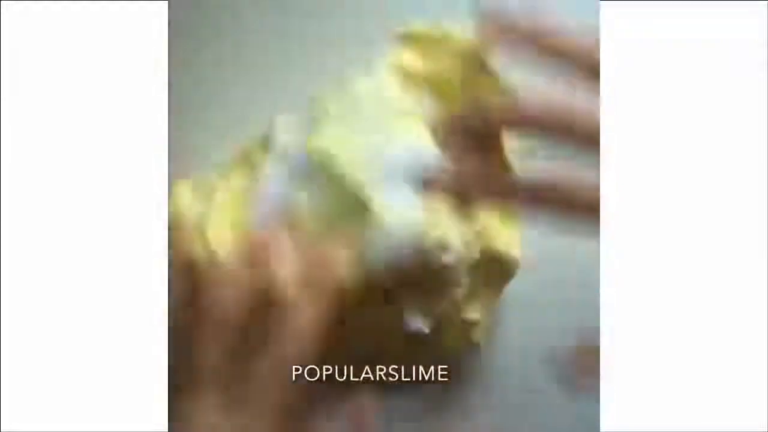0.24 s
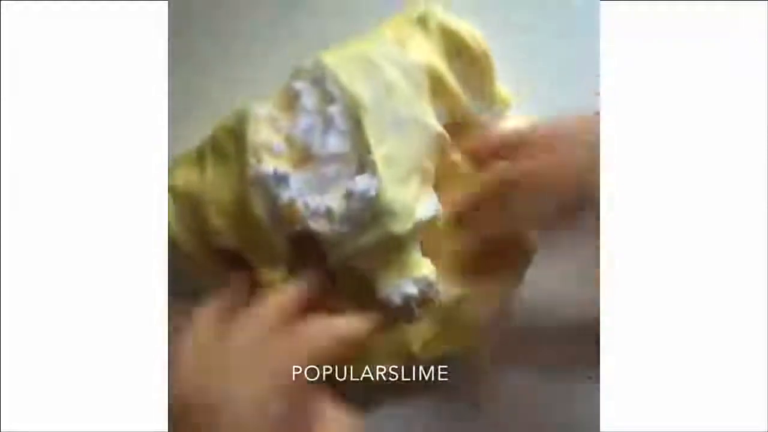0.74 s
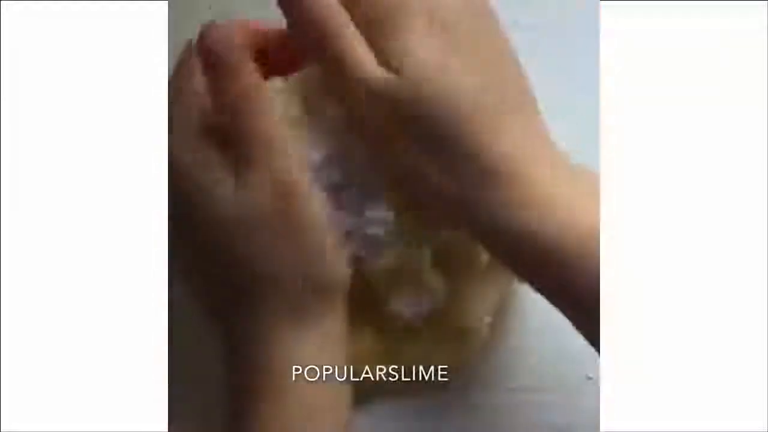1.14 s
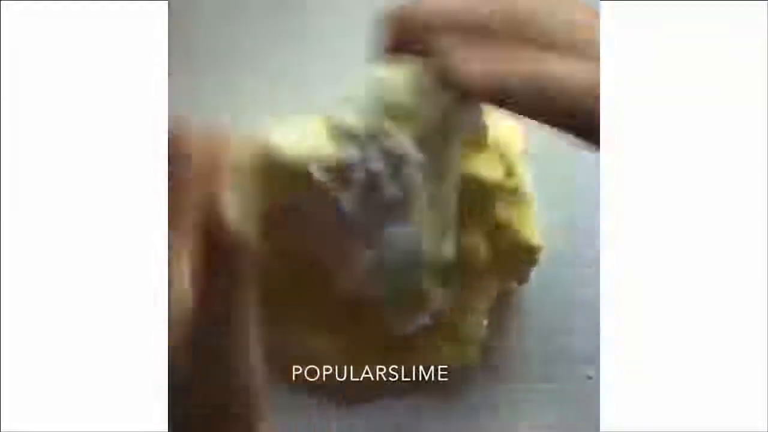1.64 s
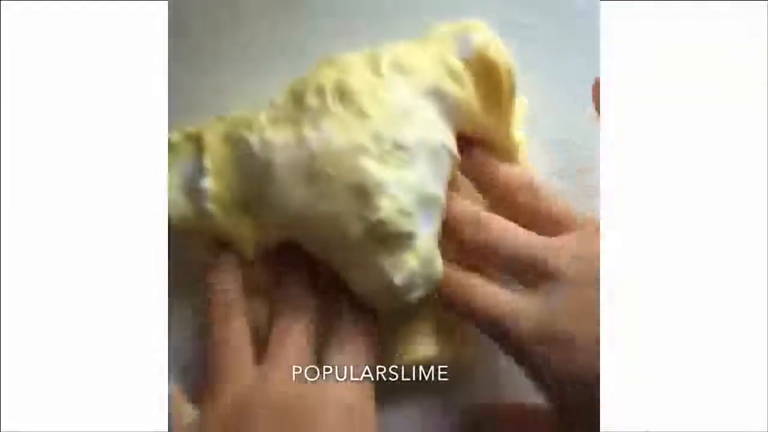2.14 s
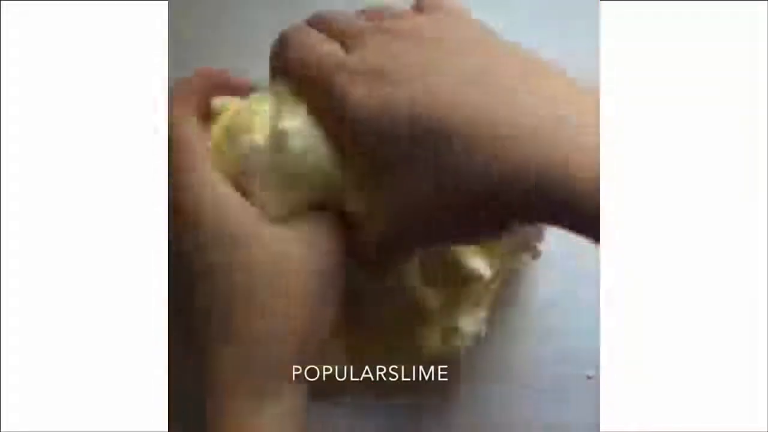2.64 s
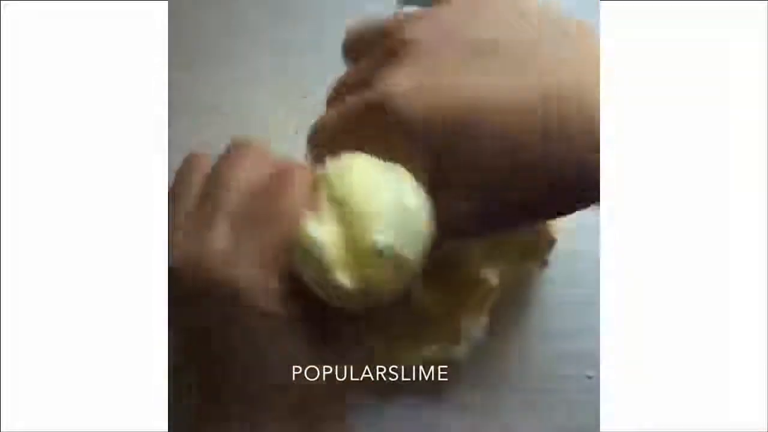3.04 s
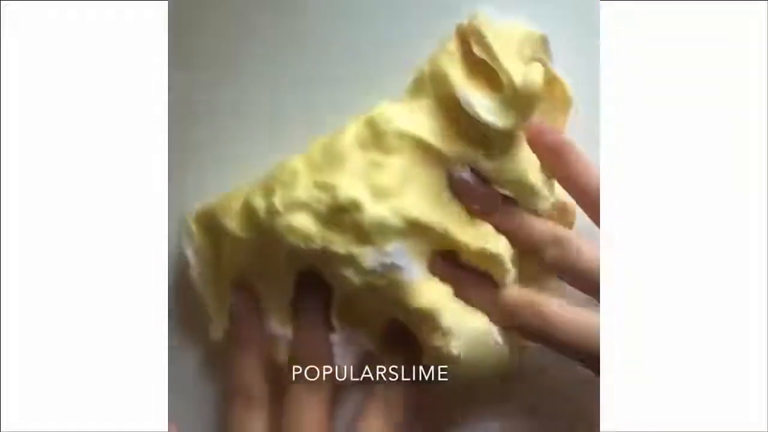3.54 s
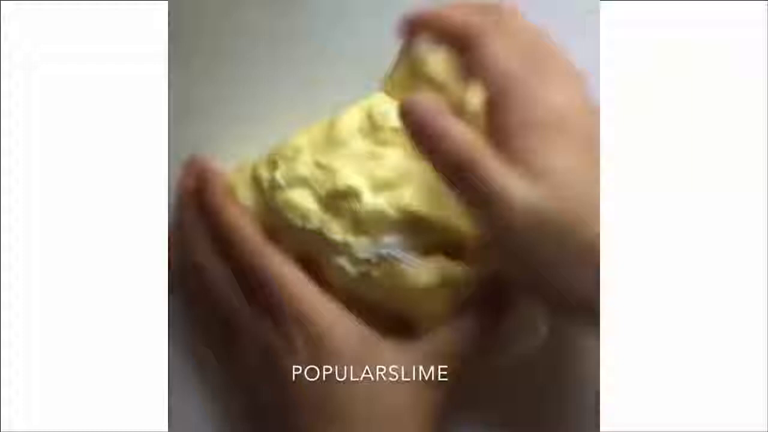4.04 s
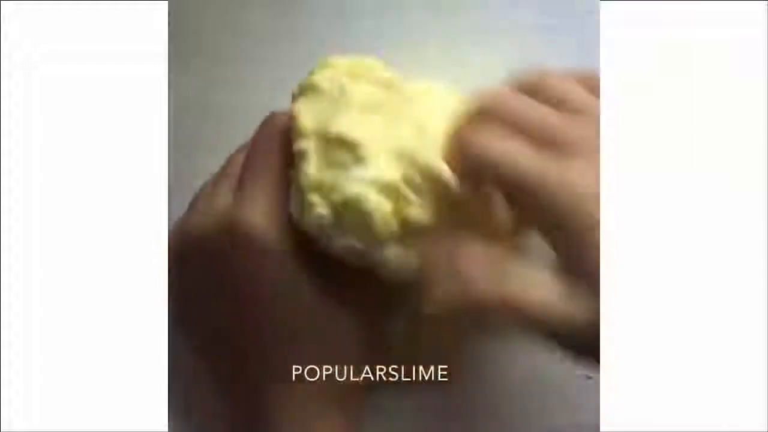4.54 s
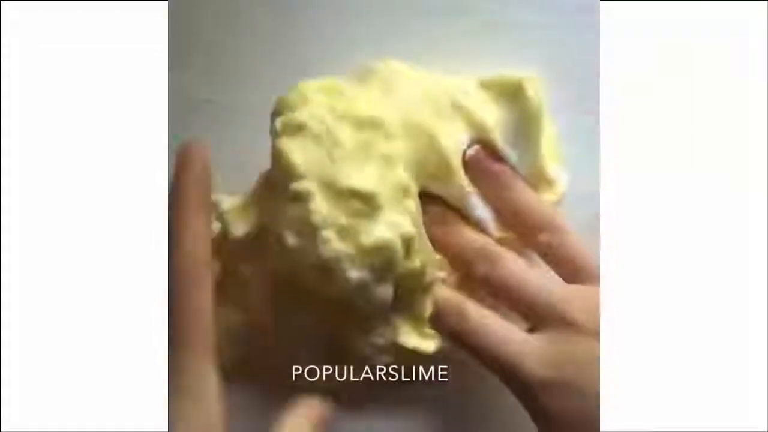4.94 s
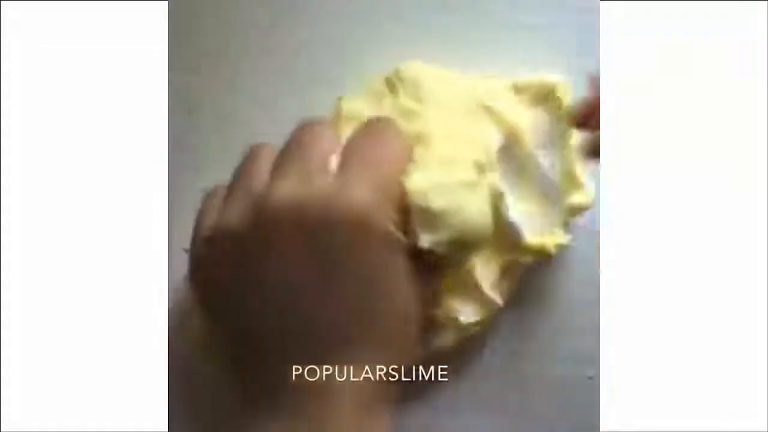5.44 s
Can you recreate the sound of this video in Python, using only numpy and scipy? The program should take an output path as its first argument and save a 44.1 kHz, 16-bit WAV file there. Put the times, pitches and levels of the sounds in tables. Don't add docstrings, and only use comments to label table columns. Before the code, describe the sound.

Close phone-like microphone, short dry room, faint hiss. Thick foamy paste is squeezed, folded and peeled: loud bright pops first, then a slap, more hard cracks, a quieter stretch with soft thuds, a burst of snaps, wet peeling, small ticking bubbles, a brief airy squeak and a last pop. Handling makes low rumbles.

```python
import sys
import numpy as np
from scipy import signal
from scipy.fft import rfft, irfft, next_fast_len
from scipy.io import wavfile
from scipy.ndimage import uniform_filter1d, map_coordinates

SR = 44100
rng = np.random.default_rng(int(sys.argv[2]) if len(sys.argv) > 2 else 0)


def volts(x):
    e = np.asarray(x, float) / 20
    return 10 ** e


def materialize(psi):
    bounded = np.clip(np.atleast_2d(psi).T, -1, 1)
    quanta = np.round(bounded * 32767).astype(np.int16)
    wavfile.write(sys.argv[1], SR, quanta)


N = 251370


def unit(x):
    return x / np.sqrt(np.mean(x ** 2, axis=-1, keepdims=True) + 1e-20)


def peaked(x, level_db):
    return volts(level_db) * x / np.abs(x).max()


def along(points, hz):
    f, v = np.transpose(points)
    return np.interp(np.log(hz + 1), np.log(f + 1), v)


def wobble(rate):
    knots = rng.standard_normal(int(N * rate / SR) + 4)
    return map_coordinates(knots, [np.arange(N) * rate / SR])


def filtered(x, response):
    m = next_fast_len(x.shape[-1] + 4096)
    return irfft(rfft(x, m) * response(np.fft.rfftfreq(m, 1 / SR)), m)[..., :x.shape[-1]]


def coloured(x, colour):
    return filtered(x, lambda f: volts(along(colour, f)))


def mode(f, hz, width_hz):
    return 1j * f * width_hz / (hz * hz - f * f + 1j * f * width_hz)


def crackle(n, spiky_db):
    return rng.standard_normal(n) * volts(spiky_db * np.minimum(rng.exponential(size=n), 3.5))


def strokes(starts, holds, levels_db, rise, sag, fall):
    out = np.full(N // 64 + 2, -120.)
    t = np.arange(len(out)) * 64 / SR
    for s, hold, db in zip(starts, holds, levels_db):
        before, held = np.maximum(s - t, 0), np.clip(t - s, 0, hold)
        after = np.maximum(t - s - hold, 0)
        out = np.maximum(out, db - rise * before - sag * held - fall * after)
    return np.interp(np.arange(N) / SR, t, out)


# pitch_hz [Hz], level_db [dB per Hz]
HUSH_COLOUR = [(18, -23), (30, 6.5), (80, 11), (187, -8), (500, -10.5), (1030, -15.5), (1440, -49.5),
               (2120, -56), (2540, -13), (5950, -19), (10500, -27), (12900, -13.5), (14300, -47.5)]


def hush():
    return volts(-60) * unit(coloured(rng.standard_normal(N), HUSH_COLOUR))


# pitch_hz [Hz], t60_s [s]
ROOM_DECAY = [(200, 0.5), (2000, 0.34), (6000, 0.28), (14000, 0.21)]


def room(x):
    out, step = np.zeros(N + 2 * SR), SR // 3
    for start in range(0, N, step):
        hz, t, z = signal.stft(rng.standard_normal(SR // 2), SR, nperseg=256)
        decay = volts(-60 * t / along(ROOM_DECAY, hz)[:, None])
        tail = signal.istft(z * decay, SR, nperseg=256)[1]
        echo = signal.fftconvolve(x[start:start + step], tail / np.linalg.norm(tail))
        out[start + 200:][:len(echo)] += echo
    return out[:N]


TABLE_HZ = 174.3
# pitch_hz [Hz], level_db [dB per Hz]
RUMBLE_COLOUR = [(20, -49), (45, 2), (58, 6.5), (75, 7), (95, -11.5), (120, 1), (200, -35)]
# start_s [s], hold_s [s], level_db [dB]
PHONE_JOLTS = [(0.114, .01, -43), (0.374, 0.11, -48), (0.918, 0.0095, -37.5), (1.12, 0.038, -39),
               (1.454, 0.0068, -42.5), (1.704, 0.035, -44), (1.899, 0.0095, -40), (2.2, .03, -50.5),
               (2.466, 0.053, -36.5), (2.713, 0.12, -48), (3.301, 0.018, -39), (3.707, 0.11, -55),
               (3.898, 0.0075, -34), (4.123, 0.23, -45), (4.694, 0.11, -52), (5.057, 0.037, -39.5),
               (5.376, 0.011, -42.5), (5.6, .01, -58)]


def phone_rumble():
    restless = rng.standard_normal(N) * volts(6.5 * wobble(25))
    hum = unit(filtered(restless, lambda f: mode(f, TABLE_HZ, 30) * mode(f, TABLE_HZ, 86)))
    rumble = unit(coloured(rng.standard_normal(N), RUMBLE_COLOUR))
    shake_db = strokes(*np.transpose(PHONE_JOLTS), rise=259.5, sag=15, fall=140.5)
    shake_db = np.maximum(shake_db, -57)
    return volts(shake_db) * (rumble + 0.26 * hum) + volts(-62.5) * hum


# pitch_hz [Hz], width_hz [Hz], level_db [dB]
TABLE_MODES = [(296, 47, 3), (470.6, 350, -7), (497, 94, -0.5), (637, 57, -1.5), (755, 25, 1),
               (985, 83, -3.5), (1310, 100, -7), (1786, 100, -13.5), (2080, 90, -17.5), (2450, 200, -19),
               (2860, 150, -18.5)]


def table_top(f):
    return sum((-1) ** k * volts(db) * mode(f, hz, w) for k, (hz, w, db) in enumerate(TABLE_MODES))


# middle_s [s], peak_db [dB], length_s [s]
PRESSES = [(0.08, -10, 0.0014), (0.345, -40.5, 0.021), (0.894, -27.5, 0.009), (0.909, -22, 0.0029),
           (0.929, -21, 0.042), (1.089, -15, 0.017), (1.12, -27, 0.042), (1.27, -40, 0.031),
           (1.368, -40, 0.016), (2.443, -16, 0.016), (2.485, -19, 0.024), (2.67, -34, 0.016),
           (2.696, -36, 0.019), (2.73, -27.5, .012), (3.251, -33, 0.018), (3.302, -30, 0.018),
           (3.338, -32.5, 0.018), (3.873, -29, .021), (3.894, -23, 0.02), (4.096, -21.5, 0.016),
           (4.138, -25.5, 0.053), (4.201, -30.5, 0.0057), (4.231, -31.5, 0.072), (4.53, -34, 0.025),
           (4.959, -36.5, 0.038), (5.031, -26.5, 0.014), (5.1, -32, 0.038), (5.317, -33, 0.019),
           (5.357, -33.5, .037), (5.408, -42, 0.052), (5.593, -25, 0.0077), (5.612, -37, 0.011),
           (1.19, -35.5, 0.026), (1.302, -40.5, 0.014), (4.35, -40.5, 0.031)]
KICK_DB, KICK_S = -41.5, .007


def presses():
    lead = 3000
    t = np.arange(-lead, lead) / SR
    boom, force = np.zeros((2, N + SR))
    pushes = PRESSES + [(s + KICK_S, db + KICK_DB, KICK_S) for s, db, *_ in BURSTING_POCKETS]
    for s, db, length in pushes:
        detune, turn = rng.standard_normal(2)
        swell = volts(db) * np.exp(-np.log(16) * (t / length) ** 2)
        where = slice(round(s * SR), round(s * SR) + len(t))
        boom[where] += swell * np.sin(2 * np.pi * TABLE_HZ * (1 + 0.025 * detune) * t + 9 * turn)
        force[where] += swell
    stir = unit(filtered(rng.standard_normal(N), table_top))
    return boom[lead:][:N] + volts(-20.5) * force[lead:][:N] * stir


# start_s [s], hold_s [s], wet_db [dB squelch], fizz_over_wet_db [dB]
SLOW_SQUEEZES = [(0.005, 0.17, -35, 3.5), (0.27, 0.089, -38.5, 4), (0.34, 0.012, -29.5, -2),
                 (0.73, 0.055, -53, -1.5), (1.09, 0.1, -55.5, -26), (1.19, 0.07, -43.5, -2),
                 (1.35, 0.12, -53.5, -2.5), (1.58, 0.088, -45, 11.5), (1.72, 0.033, -41, 2),
                 (1.79, 0.066, -38.5, 4.5), (1.85, 0.033, -41.5, 4.5), (2.67, 0.0091, -55, -12),
                 (2.73, 0.1, -59, -14), (2.9, 0.046, -55.5, 4.5), (3.03, 0.023, -35, 6),
                 (3.23, .015, -41, 6.5), (3.39, 0.023, -51.5, 5.5), (4.1, 0.14, -60, -8.5),
                 (4.31, 0.052, -50.5, 0), (4.43, 0.043, -50, 6), (4.52, .03, -51.5, 9.5),
                 (4.585, 0.0078, -42, 10), (4.64, .04, -47, 7), (4.79, .07, -54, 3), (5.41, .05, -56, 4),
                 (5.5, 0.024, -53, 8), (5.62, 0.06, -38, 0)]
# start_s [s], hold_s [s], wet_db [dB squelch], fizz_over_wet_db [dB]
HAND_PEELS = [(0.892, 0.046, -34, 0.8), (2.432, 0.035, -30, 0), (3.228, .018, -33, 2.5),
              (3.25, 0.012, -29.5, 1), (3.268, 0.024, -30.5, 0.5), (3.303, 0.015, -34.5, 0.5),
              (3.33, 0.011, -37.5, 5), (3.865, 0.055, -35, 3), (4.68, 0.1, -37.5, 3.5),
              (4.904, 0.02, -40, 1), (4.936, 0.014, -33, 2.5), (4.982, .01, -36, 0),
              (5.008, 0.02, -30.5, -1), (5.041, 0.008, -31.5, -1), (5.058, 0.016, -34, 1.5),
              (5.086, 0.0058, -32.5, -3), (5.102, 0.012, -38, -2), (5.308, 0.092, -32.5, -3.5)]


def effort():
    levels = [np.full((2, N), [[-63], [-64.5]])]
    squeeze_shape = dict(rise=232.5, sag=17, fall=264)
    peel_shape = dict(rise=745, sag=70, fall=546)
    for rows, shape in ((SLOW_SQUEEZES, squeeze_shape), (HAND_PEELS, peel_shape)):
        s, hold, wet_db, over_db = np.transpose(rows)
        levels.append([strokes(s, hold, db, **shape) for db in (wet_db, wet_db + over_db)])
    return np.max(levels, axis=0)


def bubbles(count, centre_hz, octaves, cycles, spiky_db):
    draw, t = rng.random((count, 3)), np.arange(256) / SR
    hz = np.clip(centre_hz * 2 ** (octaves * rng.standard_normal((count, 1))), 400, 14000)
    size_db = -spiky_db * np.log(draw[:, 1:2] + 0.018)
    age = t * hz / (cycles * (.5 + draw[:, 2:]))
    ring = volts(size_db) * age * np.exp(-3 * age) * np.sin(2 * np.pi * hz * t * (1 + 0.1 * age))
    where = (draw[:, :1] * N).astype(int) + np.arange(256)
    return unit(np.bincount(where.ravel(), ring.ravel(), N + 256)[:N])


def rush(colour, patchy_db):
    z = signal.stft(rng.standard_normal(N), nperseg=256)[2]
    field = uniform_filter1d(rng.standard_normal(z.shape), size=5, axis=0)
    field = uniform_filter1d(field, size=4, axis=1)
    noise = signal.istft(z * volts(patchy_db * field / field.std()), nperseg=256)[1][:N]
    return unit(coloured(noise, colour))


# pitch_hz [Hz], level_db [dB per Hz]
WET_COLOUR = [(150, -45), (250, -8), (640, -13), (792, -39.5), (1030, -10), (1450, -20.5), (1860, -3),
              (5000, -14.5), (6500, -36), (11000, -120)]
# pitch_hz [Hz], level_db [dB per Hz]
FIZZ_COLOUR = [(1760, -16), (3000, -11), (5300, -2.5), (7490, -5.5), (8150, -7), (10500, -4.5),
               (11300, -3.5), (13300, -5), (14300, -28)]


def paste():
    wet_db, fizz_db = effort()
    lumps_db = 1.1 * wobble(45) + 1.6 * wobble(160)
    wet = bubbles(count=8000, centre_hz=1288, octaves=.55, cycles=5.0, spiky_db=1.5)
    wet = wet + rush(WET_COLOUR, patchy_db=1.5)
    fizz = bubbles(count=14000, centre_hz=5900, octaves=0.57, cycles=3.4, spiky_db=3.5)
    fizz = .5 * fizz + rush(FIZZ_COLOUR, patchy_db=3)
    squelch = unit(volts(lumps_db) * wet)
    tearing = unit(volts(lumps_db + 0.85 * wobble(90)) * fizz)
    return volts(wet_db) * squelch + volts(fizz_db) * tearing


def slit(t, start, end, open_s, close_s):
    return (1 + np.tanh((t - start) / open_s)) * (1 + np.tanh((end - t) / close_s)) / 4


# start_s [s], end_s [s], first_pitch_hz [Hz], last_pitch_hz [Hz], level_db [dB]
AIR_JET = (5.4045, 5.4215, 1925, 1850, -15.5)
# start_s [s], end_s [s], pitch_hz [Hz], level_db [dB]
SLIT_LEAKS = [(5.428, 5.444, 1885, -41), (5.452, 5.474, 1880, -39), (5.503, 5.523, 1862, -41.5),
              (5.39, 5.4, 1950, -42)]


def whistle():
    start, end, first_hz, last_hz, db = AIR_JET
    t = np.arange(N) / SR
    phase = 2 * np.pi * np.cumsum(np.interp(t, [start, end], [first_hz, last_hz])) / SR
    tone = np.sin(phase)
    tone += volts(-23.5 + 3.6 * wobble(300)) * np.sin(2 * phase)
    tone += volts(-36 + 4 * wobble(300)) * np.sin(3 * phase)
    out = volts(db) * tone * slit(t, start, end, .0028, .003)
    for a, b, hz, level_db in SLIT_LEAKS:
        leak = np.sin(2 * np.pi * hz * t) * slit(t, a, b, 0.0056, .002)
        out += volts(level_db + 2.5 * wobble(150)) * leak
    return np.sqrt(2) * out


# start_s [s], knock_db [dB], slap_over_knock_db [dB], t60_s [s], flattening_s [s]
LUMP_LANDINGS = [
    (1.077, -17.5, -7, 0.22, 0.029),
    (2.662, -33.5, -16, 0.13, 0.023),
    (2.722, -30, -6, 0.086, 0.014),
    (4.083, -25, -15, 0.2, 0.04),
]


def thuds():
    out, t = np.zeros(N + SR), np.arange(SR // 4) / SR
    lead = 230
    for s, db, slap_db, t60, spread_s in LUMP_LANDINGS:
        flat = np.maximum(t - spread_s, 0)
        push = rng.standard_normal(len(t)) * (volts(-60 * flat / t60) + .6 * volts(-60 * t / 0.03))
        push *= 1 - np.exp(-t / 0.004)
        push[lead:lead + 40] += 2.4 * np.hanning(40)
        knock = filtered(push, table_top)
        wet = crackle(len(t), spiky_db=-1.5) * (volts(-60 * flat / 0.2) + 1.5 * volts(-60 * t / .04))
        wet *= 1 - np.exp(-t / 0.0027)
        wet[lead + 20] += 15
        slap = filtered(wet, lambda f: mode(f, 1900, 900) + 0.33 * mode(f, 2300, 600))
        landing = peaked(knock, db + 4.0) + peaked(slap, db + slap_db + 4.0)
        out[round(s * SR) - lead:][:len(t)] += landing
    return out[:N]


# start_s [s], peak_db
# [dB], pitch_hz [Hz], t60_s [s]
CLOSING_POCKETS = [(0.154, -12, 1810, 0.017), (0.896, -24, 985, 0.033), (2.051, -42, 1100, 0.013),
                   (2.153, -33.5, 1325, 0.014), (3, -18, 1317, 0.035), (3.252, -28, 1260, 0.051),
                   (3.269, -23.5, 1060, 0.041), (3.304, -25.5, 1000, 0.02), (3.854, -31, 1154, 0.043),
                   (4.321, -43, 1004, 0.081), (4.44, -33.5, 905, 0.03), (4.477, -38, 1080, 0.019),
                   (4.502, -39, 900, 0.036), (4.676, -20, 1090, 0.0081), (4.908, -25, 1100, 0.013),
                   (5.014, -27, 1006, 0.077), (5.313, -29, 1030, 0.029), (5.088, -24.5, 1150, 0.019),
                   (4.691, -26, 1054, 0.023), (4.94, -27, 1150, 0.023), (2.79, -44, 520, 0.075),
                   (2.8, -50, 2040, .06), (2.825, -51, 515, 0.063), (1.169, -27, 1250, .025),
                   (5.02, -25, 1080, .02), (0.0775, -3, 2350, .018), (2.436, -22, 1000, .02),
                   (2.45, -25, 1050, .018), (2.46, -23, 1000, .02), (2.444, -27, 2300, .015),
                   (3.215, -33, 1300, .03), (3.27, -27, 1900, .025), (3.283, -30, 1950, .02),
                   (3.304, -32, 2150, .03), (3.365, -38, 1100, .02), (3.896, -29, 1150, .03),
                   (3.876, -31, 900, .025), (4.982, -29, 1270, .015), (5.088, -22, 2500, .015),
                   (4.448, -27, 9100, .03), (4.452, -26, 9300, .03), (5.33, -30, 900, .025),
                   (5.345, -30, 1200, .025), (5.375, -30, 850, .03), (5.385, -33, 1200, .03),
                   (4.72, -36, 950, .02), (4.95, -35, 700, .025), (0.335, -27, 700, .03),
                   (0.345, -24, 1200, .02)]
# start_s [s], peak_db [dB], pitch_hz [Hz], t60_s [s]
TABLE_RINGS = [(2.723, -26, 291, .09), (2.723, -30, 545, .04), (2.724, -40, 1023, .07),
               (2.664, -36, 700, .06), (2.664, -42, 1400, .04), (2.664, -45, 1860, .04),
               (4.084, -29, 612, .07), (4.083, -33, 1750, .02), (4.083, -34, 2700, .015),
               (1.079, -24, 291, .1), (1.079, -27, 604, .08), (1.08, -28, 730, .08), (0.078, -16, 300, .05),
               (0.043, -20, 420, .03)]


def blips():
    out, t = np.zeros(N + SR), np.arange(4096) / SR
    for rows, rise in ((CLOSING_POCKETS, 3), (TABLE_RINGS, 0)):
        for s, db, hz, t60 in rows:
            ring = np.sin(2 * np.pi * hz * t * (1 + rise * t)) * volts(-60 * t / t60)
            ring *= 1 - np.exp(-t / 0.00068)
            out[round(s * SR) - 40:][:len(t)] += volts(db + 3.0) * ring
    return out[:N]


def pop(hz, t60, levels_db, lead):
    t = (np.arange(6144) - lead) / SR
    opened = t >= 0
    after = np.abs(t) * opened
    burst = volts(-60 * after / max(t60, .004))
    stretch = volts(-14.0 + 60 * t / 0.0028)
    tear = crackle(len(t), spiky_db=6.0) * np.where(opened, burst, stretch)
    tear += rng.standard_normal(len(t)) * volts(-14.0 - 60 * after / 0.058) * opened
    tear[lead + 4] += 14
    chambers = np.clip(hz * 2 ** (.6 * rng.standard_normal(5)), 300, 13000)

    def pocket(f):
        side = sum(mode(f, c, max(c / 16, 220)) for c in chambers)
        return mode(f, hz, 0.8 * hz) * mode(f, 1.114 * hz, 1.4 * hz) + volts(-8.5) * side

    cavity = filtered(tear, pocket)
    body = filtered(tear, lambda f: mode(f, 1400, 990) + 0.099 * mode(f, 360, 340))
    snap = filtered(tear, lambda f: mode(f, 9500, 7100) * mode(f, 12000, 15000))
    return sum(peaked(part, db) for part, db in zip((cavity, body, snap), levels_db))


# start_s [s], peak_db [dB], pitch_hz [Hz cavity], snap_over_peak_db [dB], t60_s [s]
BURSTING_POCKETS = [(0.0215, -16, 5540, -14, .024), (0.042, 8, 5200, -18, .033),
                    (0.077, 7, 2316, -16, 0.016), (0.0917, 10, 6360, -16, 0.045),
                    (0.333, -16, 2180, -27, 0.07), (0.61, -22.5, 5260, -5.5, 0.0356),
                    (0.7, -5.5, 2520, -51.5, 0.015), (0.899, -17.5, 6450, -3.5, .026),
                    (1.1698, -22, 1910, -38, 0.021), (1.438, 11, 3700, -26, .018),
                    (1.487, 0, 4800, -6, 0.009), (1.5255, 8, 6900, -19, 0.04),
                    (1.543, -1.5, 6744, -9, .054), (1.6856, -20.5, 6190, -9, 0.016),
                    (2.9723, -24, 6220, 0, 0.031), (2.9795, 2, 8630, -3.5, 0.017),
                    (3.0028, -11.5, 7320, -11, 0.0077), (3.0331, -7.5, 2240, 7, 0.024),
                    (4.3467, -16.5, 5700, -26, 0.034), (4.415, -17, 7270, -6, 0.016),
                    (4.5567, -4, 6856, -9, .026), (4.5834, -2.5, 5210, -1.5, .035),
                    (5.4753, -13, 2530, -8, .026), (5.5905, -3, 1800, -22, .03)]
# start_s [s], peak_db [dB], pitch_hz [Hz], snap_over_peak_db [dB], t60_s [s]
CRACKING_FILMS = [(0.042, 0, 2500, -36.5, 0.03), (0.0975, 12, 5900, -10, 0.025),
                  (0.101, -3, 2200, -35, .042), (0.107, 15, 6100, -8, .04), (0.1319, 0, 2250, 0, .012),
                  (0.1556, -17, 1750, -6, .024), (1.441, 1, 2500, -34.5, 0.027),
                  (1.5256, -7, 2570, -36, 0.068), (1.5815, -15, 6400, -15.5, .033),
                  (1.6183, -7.5, 6540, -4, 0.045), (1.6351, -13.5, 5300, 2, 0.014),
                  (1.6615, -6.5, 2270, -9.5, 0.026), (2.0685, -25, 5850, -17.5, 0.04),
                  (2.914, -20, 4500, -20, 0.03), (3.0485, -10.5, 3940, 3.5, 0.036),
                  (3.0648, -6, 7060, 3.5, 0.028), (3.087, -2.5, 5600, -8, 0.033),
                  (4.4487, -32.5, 7830, -2, 0.066), (4.4903, -15.5, 7500, -18.5, .025),
                  (4.5835, -14, 2000, -39.5, 0.023), (4.5628, -10, 5690, -6, 0.027),
                  (5.5251, -15, 6400, 7.5, 0.018), (5.526, -23, 2400, -42, 0.025),
                  (5.592, 2, 4300, -14, .08), (5.591, -15, 482, -45, 0.054), (1.4385, -2, 4700, -30, .025),
                  (1.526, -21, 327, -44.5, 0.028), (1.662, -18, 1300, -45, .03),
                  (1.242, -27.5, 3700, -18.5, .05), (1.173, -26, 560, -45, .04),
                  (4.082, -27.5, 6400, -14, 0.011), (5.607, -9, 3520, -19.5, 0.037),
                  (4.437, -29, 2500, -30, .03), (4.465, -34, 3000, -30, .03), (2.662, -43, 3400, -20, .04),
                  (2.868, -46, 2200, -20, .03), (2.405, -40, 2200, -30, .05), (0.012, -30, 5500, -20, .04),
                  (4.535, -30, 3500, -10, .04), (0.051, -10, 1500, -40, .04)]
# start_s [s], peak_db [dB], pitch_hz [Hz cavity]
TICKING_BUBBLES = [(0.386, -22.5, 5700), (0.4454, -34, 2470), (0.6752, -35, 3700), (1.3903, -38, 1910),
                   (1.4138, -30.5, 5100), (1.6117, -22.5, 7160), (1.711, -24.5, 2200), (2.049, -49, 2160),
                   (2.15, -43, 2234), (2.1858, -36.5, 4550), (2.222, -33.5, 5440), (2.804, -44, 2030),
                   (2.8262, -33, 7500), (2.8898, -35, 2400), (2.947, -42, 1400), (3.425, -33, 4040),
                   (3.5752, -45, 6450), (4.21, -34, 2600), (4.3217, -30.5, 3660), (4.3382, -24.5, 4500),
                   (4.3775, -29, 5970), (4.4432, -24, 2500), (4.5016, -25.5, 3740), (4.5186, -28, 5460),
                   (4.551, -20, 7450), (4.6903, -19, 3540), (4.866, -20.5, 4800), (4.984, -24, 2680),
                   (5.088, -18.5, 2440), (5.5072, -22, 5000), (1.753, -26.5, 2860), (1.788, -27, 1150),
                   (3.334, -23, 4530), (3.228, -24.5, 1250), (1.355, -44.5, 1950), (5.041, -21.5, 2600),
                   (2.768, -41, 2295), (4.204, -39.5, 9100), (0.018, -22, 5200), (0.0235, -22, 1800),
                   (0.147, -14, 6400), (1.484, -20, 1300), (2.415, -30, 4150), (2.422, -28, 4650),
                   (2.428, -24, 2920), (2.434, -17, 4200), (2.45, -24, 2200), (2.459, -27, 6000),
                   (3.25, -22, 5000), (4.696, -22, 5200), (4.905, -31, 5000), (4.936, -27, 4700),
                   (5.059, -27, 2200), (5.018, -27, 4600), (3.825, -42, 3000), (3.876, -30, 2800),
                   (3.898, -28, 3000), (5.559, -40, 1900), (4.66, -32, 1000), (5.118, -34, 5000)]


def pops():
    out, lead = np.zeros(N + SR), 220
    rows = [(*row, -12 - 4.5 * np.log2(row[2] / 3500)) for row in BURSTING_POCKETS]
    rows += [(*row, -42.5) for row in CRACKING_FILMS]
    rows += [(*row, -6.5, 0.036, -21.5) for row in TICKING_BUBBLES]
    for s, db, hz, snap_db, t60, body_db in rows:
        sound = pop(hz, t60, (db - .1, db + body_db + 2.0, db + snap_db + 7.0), lead)
        out[round(s * SR) - lead:][:len(sound)] += sound
    return out[:N]


def scene():
    sharp = pops() + blips() + thuds()
    jet = whistle()
    echo = volts(-15.5) * room(sharp + .45 * jet)
    soft = echo + paste() + presses() + phone_rumble() + hush()
    soft = filtered(soft, lambda f: 1 / (1 + (f / 14200) ** 80))
    return (sharp + jet + soft)[None]


def low_pass(x):
    return signal.sosfilt(signal.butter(12, 16040, fs=SR, output="sos"), x)


# pitch_hz [Hz], level_db [dB]
OVERALL_COLOUR = [(30, -5), (100, 2.5), (9300, -1), (10500, -6.5), (11700, -2.5), (13800, -3.5), (14400, -26),
                  (16000, -24.5)]


def record(dry):
    x = coloured(dry, OVERALL_COLOUR)
    x = x / (1 + np.abs(x / .97) ** 12) ** (1 / 12)
    mix = filtered(x, lambda f: 1 - 1 / (1 + (f / 35) ** 4))
    return low_pass(mix)


dry = scene()
out = record(dry)
materialize(out)
```